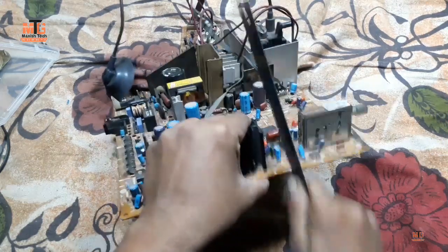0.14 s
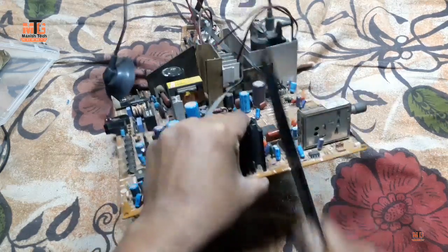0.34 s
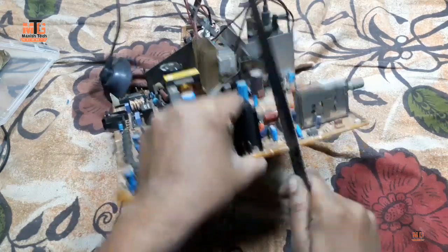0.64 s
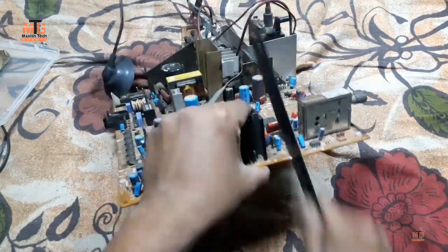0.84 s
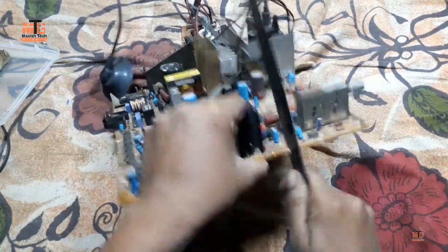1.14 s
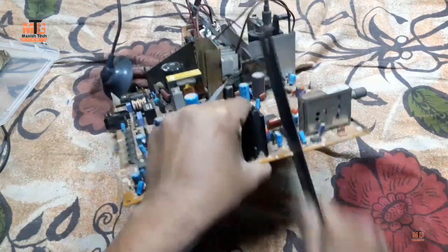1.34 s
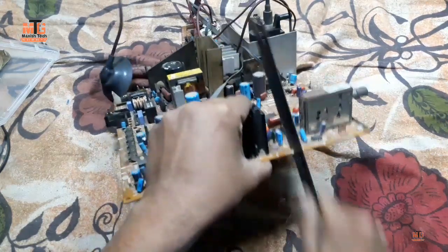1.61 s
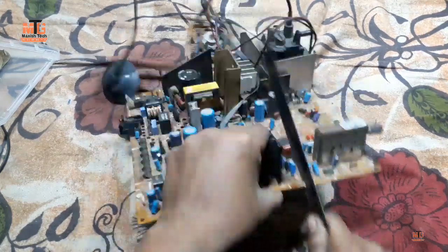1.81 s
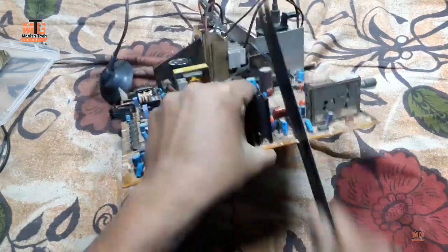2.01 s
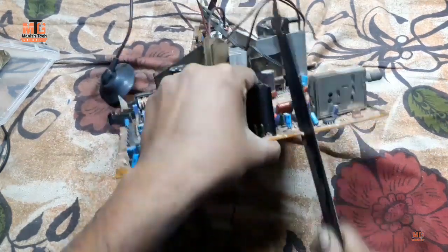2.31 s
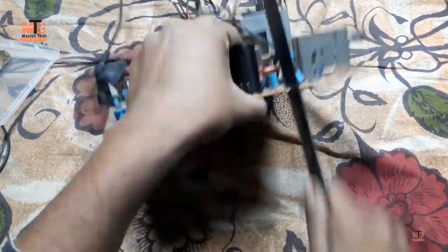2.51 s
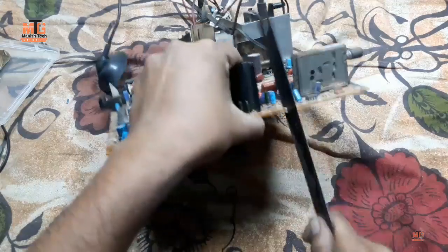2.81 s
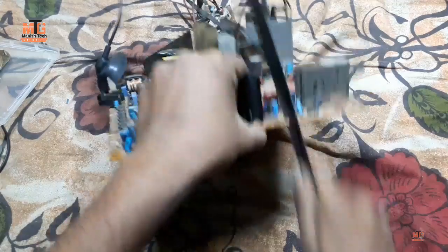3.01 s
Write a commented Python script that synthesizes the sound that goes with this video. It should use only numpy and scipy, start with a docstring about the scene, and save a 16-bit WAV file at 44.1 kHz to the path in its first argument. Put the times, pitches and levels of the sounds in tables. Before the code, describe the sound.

A hacksaw cuts a circuit board close up, about four back-and-forth strokes a second, with a gritty growl on each push and a rasp and thin metallic zing on each pull. At about 1.7 seconds it pauses with faint ticks. From 2 seconds until just past 3, the sawing resumes, slightly softer and less even, the blade knocking in the slot. The small room has a faint low rumble.

```python
"""Hacksaw through a circuit board.

A small room with a low rumble, one microphone close to a board held down on a cloth and sawn by hand,
four times a second. On the push the teeth bite and the loaded board growls in its modes; on the pull
they skate, rasp and make the blade zing. The blade knocks in the slot, also during the one short rest
in which the grip is changed. The room rings briefly behind it all."""
import sys
import numpy as np
from scipy import signal
from scipy.fft import rfft, irfft
from scipy.io import wavfile
from scipy.ndimage import uniform_filter1d, map_coordinates

SR = 44100
rng = np.random.default_rng(int(sys.argv[2]) if len(sys.argv) > 2 else 0)


def output_pcm(signal):
    """Save a mono or channel-first signal as 16-bit PCM at the path in sys.argv[1].

    Samples are clipped to [-1, 1] before scaling.
    """
    pcm = np.clip(np.atleast_2d(signal).T, -1, 1) * 32767
    wavfile.write(sys.argv[1], SR, np.round(pcm).astype(np.int16))


N = 138915
TIME = np.arange(N) / SR
REGRIP_S, CUTOFF_HZ = 1.9, 15500

# resonances (+) and dead spots (-) of board and saw frame: (frequency [Hz], width [Hz], lift [dB])
BOARD_MODES = [(329, 12.5, 11), (383, 24, -1), (510.6, 36, 6), (555.3, 21, 7), (640, 44, -0.5),
               (702, 14, 5.5), (770, 16, 3.5), (906, 24, 7), (1015, 15.6, 10), (1071, 17, 6), (1231, 14, 6),
               (1390, 16, 5.5), (1530, 34, -4), (1608, 13.4, 7.5), (1767, 78, 5), (2000, 45, 7),
               (2381, 79, 10), (2492, 57, 8.5), (2613, 140, -10), (3250, 68, 8)]
# resonances (+) and a dead spot (-) of the thin steel blade: (frequency [Hz], width [Hz], lift [dB])
STEEL_MODES = [(3670, 130, 5), (3830, 90, -8), (4150, 130, 5.5), (5560, 36, 3.5), (6830, 44, 4.5),
               (8080, 110, 4), (8820, 190, 6.5), (9870, 220, 4.5), (10820, 120, 2.5)]


def from_db(db):
    """Decibels to gain."""
    return 10 ** (np.asarray(db) / 20)


def rms_one(x):
    """Scale to unit power."""
    return x / np.sqrt(np.mean(x ** 2) + 1e-20)


def at_hz(points, hz):
    """Read a table on a log-frequency axis."""
    frequencies, values = np.transpose(points)
    return np.interp(np.log(np.maximum(hz, 1)), np.log(frequencies), values)


def drift(rate_hz):
    """Smooth random wander of unit power."""
    pole = np.exp(-2 * np.pi * rate_hz / SR)
    return rms_one(signal.lfilter([1], [1, -2 * pole, pole * pole], rng.standard_normal(N + SR))[SR:])


def colour(x, spectrum, modes=(), size=16384):
    """Causal filter of unit power gain: a broad colour with ringing resonances on top."""
    hz = np.arange(size // 2 + 1) * SR / size
    lifts = [1 + (from_db(db) ** 2 - 1) / (1 + (2 * (hz - f) / width) ** 2) for f, width, db in modes]
    magnitude = from_db(at_hz(spectrum, hz)) * np.sqrt(np.prod(lifts, axis=0))
    cepstrum = irfft(np.log(magnitude))
    cepstrum[1:size // 2] *= 2   # fold to minimum phase
    cepstrum[size // 2 + 1:] = 0
    response = irfft(np.exp(rfft(cepstrum)))
    return signal.fftconvolve(x, response / np.linalg.norm(response))[:N]


def bursts(events, decay_s):
    """A short dying burst of friction at each event."""
    gain = sum((TIME >= start) * from_db(db) * np.exp(-np.clip((TIME - start) / decay_s, 0, 20))
               for start, db in events)
    return gain * rng.standard_normal(N)


def room_tone():
    """The steady low rumble of the place, far below the saw."""
    # colour of the rumble: (frequency [Hz], level [dB])
    spectrum = [(20, -36), (42, -32), (60, -13), (120, -1), (180, -4), (330, -4), (480, -13), (1000, -18.5),
                (2500, -26), (6000, -35), (15500, -49)]
    return from_db(-42) * colour(rng.standard_normal(N), spectrum)


def room_reverb(x, delay_s=0.0047):
    """The near walls send the microphone a diffuse tail that dies band by band."""
    # reverberation of the room: (frequency [Hz], time to fall 60 dB [s])
    t60 = [(150, 0.66), (500, 0.36), (1500, 0.36), (4000, 0.3), (9000, 0.35), (16000, 0.041)]
    age, tail = TIME[:SR // 2], 0
    edges = np.geomspace(60, CUTOFF_HZ, 9)
    for low, high in zip(edges, edges[1:]):
        bandpass = signal.butter(2, [low, high], "band", fs=SR, output="sos")
        band = signal.sosfilt(bandpass, rng.standard_normal(len(age)))
        tail = tail + band * np.exp(-np.log(1000) * age / at_hz(t60, np.sqrt(low * high)))
    tail = tail * np.clip(age / delay_s - 1, 0, 1)
    return from_db(-11.5) * signal.fftconvolve(x, tail / np.linalg.norm(tail))[:N]


def steadying_hand(x):
    """The hand that steadies the board shifts its resonances when it takes a new grip."""
    # resonances each grip adds (+) or damps (-): (frequency [Hz], width [Hz], lift [dB])
    first_grip = [(1812, 91, 5), (2796, 34, 7), (3660, 140, 4.5), (6150, 160, 2.5), (10900, 1200, 4)]
    second_grip = [(232, 210, 4), (610, 130, -2.5), (1114, 140, 2.5), (1685, 100.5, 8), (2740, 440, -2.5),
                   (3270, 90, 4.5), (8420, 520, 5), (12400, 1200, 3.5)]
    # neutral colour: (frequency [Hz], level [dB])
    flat = [(20, 0), (20000, 0)]
    late = TIME > REGRIP_S
    return colour(x * ~late, flat, first_grip) + colour(x * late, flat, second_grip)


def flexing(x, depth=0.0041, rate_hz=3.96):
    """Board and blade flex under the arm, so their resonances wander a little from stroke to stroke."""
    lag_s = depth * drift(rate_hz) / (2 * np.pi * rate_hz)
    return map_coordinates(x, [(TIME - lag_s) * SR], order=3)


def blade_knocks():
    """The blade knocks or snags in the slot and sets board and steel ringing."""
    # knocks: (time [s], level [dB])
    knocks = [(.014, -26), (.498, -29), (.868, -17), (1.820, -31.5), (1.920, -33), (1.941, -29.5),
              (1.996, -21.5), (2.000, -22.5), (2.038, -23), (2.173, -15), (2.185, -20), (2.235, -8),
              (2.356, -19), (2.443, -25), (2.473, -13), (2.570, -27), (2.672, -15), (2.915, -17),
              (2.945, -18), (2.979, -11.5)]
    # colour of a knock: (frequency [Hz], level [dB])
    spectrum = [(50, -23), (200, -7), (800, 5), (2200, -1.5), (3000, -7.5), (6000, -10.5), (9000, -12.5),
                (15500, -24)]
    return from_db(2) * colour(bursts(knocks, decay_s=0.0024), spectrum, BOARD_MODES + STEEL_MODES)


def blade_chirps(width_hz=1900):
    """Each time the blade sticks it rings at a pitch set by where the slot pinches it."""
    # moments of sticking: (time [s], level [dB], pitch [Hz])
    sticks = [(0.3017, -5.5, 11200), (0.3158, -7, 8930), (0.424, -10, 8000), (0.5467, -5, 10600),
              (0.622, -15, 10100), (0.7913, -4, 8510), (0.8074, -11, 10890), (1.0398, -9.5, 9725),
              (1.056, -5, 8870), (1.3254, -11, 8860), (1.6955, -14, 9730), (2.1141, -14.5, 8680),
              (2.3554, -12, 8050), (2.615, -25, 8814), (2.8534, -20, 8490), (2.8635, -18, 8520),
              (3.106, -10, 8730)]
    chirps = np.zeros(N)
    for start, db, hz in sticks:
        resonance = signal.iirpeak(hz, hz / width_hz, fs=SR)
        chirps += signal.lfilter(*resonance, bursts([(start, db)], decay_s=0.0015))
    return chirps


def juddering(rate_hz=94, hold_s=0.031):
    """The blade catches and slips quickly; the arm evens out anything slower than hold_s."""
    slip = drift(rate_hz)
    return np.clip(rms_one(slip - uniform_filter1d(slip, int(hold_s * SR))), -2, 2)


def effort(strokes, levels_db, release_db_per_s, late_swell_db=0, arch_db=2):
    """Each stroke takes hold, swells along an arch and fades as the arm turns round."""
    gain = np.zeros(N)
    for (start, length, attack_s, swell_db), db in zip(strokes[:, :4], levels_db):
        age = TIME - start
        along = np.clip(age / length, 0, 1)
        attack = np.clip(age / attack_s, 0, 1)
        slope_db = (swell_db + late_swell_db * (start > REGRIP_S)) * (along - .5)
        hump_db = arch_db * (np.sin(np.pi * along) - 2 / np.pi)
        fade_db = release_db_per_s * np.maximum(age - length, 0)
        gain = np.maximum(gain, attack * from_db(db + slope_db + hump_db - fade_db))
    return gain


def blade_zing(strokes, release_db_per_s, judder_db=4):
    """The blade rubs the walls of the slot and sings in the high treble, now and then with a chirp."""
    # colour of the zing: (frequency [Hz], level [dB])
    spectrum = [(1000, -36), (7000, -21.5), (8300, -2), (9400, -2), (9900, -1.5), (11500, -2), (12600, -9),
                (15500, -14.5)]
    rub = rms_one(rng.standard_normal(N) * from_db(judder_db * juddering()))
    rub = rub * effort(strokes, strokes[:, 6] - 2.5, release_db_per_s)
    return colour(rub + blade_chirps(), spectrum, STEEL_MODES)


def teeth(strokes, teeth_per_s=820, end_speed=.7, jitter=.25, spread_db=2.5, crumble_s=0.0014):
    """Teeth strike the edge unevenly, fastest in mid-stroke; resin crumbles after each bite."""
    arch = sum(np.sin(np.pi * np.clip((TIME - start) / length, 0, 1)) for start, length in strokes[:, :2])
    speed = end_speed + (1 - end_speed) * arch
    rate = teeth_per_s * speed * np.exp(jitter * drift(teeth_per_s / 2))
    struck = np.diff(np.floor(np.cumsum(rate) / SR), prepend=0) > 0
    bites = struck * from_db(spread_db * np.clip(rng.standard_normal(N), -2, 2)) / np.sqrt(rate)
    crumble = signal.lfilter([1], [1, -np.exp(-1 / (crumble_s * SR))], bites) * rng.standard_normal(N)
    return rms_one(bites - bites.mean()), rms_one(crumble)


def sawing(strokes, growl_colour, growl_db, rasp_db, release_db_per_s):
    """Bites shake the board and crumbling resin rasps; both judder as the blade catches and frees."""
    # colour of the rasp: (frequency [Hz], level [dB])
    rasp_colour = [(200, -49.5), (1800, -7.5), (3000, 3), (4600, 1), (6200, 0), (7400, 0), (9000, -2),
                   (11200, -7), (13000, -10), (15500, -11.5)]
    crumble_share, dust_share = 0.62, 0.31
    growl_judder_db, rasp_judder_db = 2, 1.86
    bites, crumble = teeth(strokes)
    judder = juddering()
    force = np.sqrt(1 - crumble_share) * bites + np.sqrt(crumble_share) * crumble
    force = rms_one(force * from_db(growl_judder_db * judder))
    force *= effort(strokes, strokes[:, 4] + growl_db, release_db_per_s)
    dust_rub = rng.standard_normal(N)
    grit = np.sqrt(1 - dust_share) * crumble + np.sqrt(dust_share) * dust_rub
    grit = rms_one(grit * from_db(rasp_judder_db * judder))
    # in the looser second grip the rasp builds later in each stroke
    grit *= effort(strokes, strokes[:, 5] + rasp_db, release_db_per_s=574, late_swell_db=5)
    growl = colour(force, growl_colour, BOARD_MODES)
    rasp = colour(grit, rasp_colour, BOARD_MODES + STEEL_MODES)
    return growl + rasp


def pull_strokes(release_db_per_s=563):
    """On the pull the teeth skate: a lighter growl, with rasp and the zing of the blade."""
    # pulls: (start [s], length [s], attack [s], swell [dB], growl [dB], rasp [dB], zing [dB])
    pulls = [(0.008,0.056,0.0018,3.5,-24,-25,-23.5), (0.239,0.08,0.00084,1,-21.5,-23.5,-20.5),
             (0.495,0.082,0.0019,-0.5,-20.5,-21.5,-24), (0.737,0.085,0.012,7,-23,-24,-23.5),
             (0.985,0.093,.012,7,-23,-23.5,-27), (1.237,0.097,.014,1.5,-22,-22.5,-26.5),
             (1.498,0.083,.004,6,-21,-23.5,-28.5), (2.036,0.086,0.011,7.5,-24.5,-28,-34.5),
             (2.297,.092,0.014,7.5,-28,-30.5,-40), (2.564,0.063,0.008,3.5,-23.5,-27,-50),
             (2.797,0.076,.01,0.5,-21,-24.5,-31.5), (3.051,0.08,0.0071,8,-25.5,-27,-32.5)]
    # colour of the growl under skating teeth: (frequency [Hz], level [dB])
    growl_colour = [(40, -48), (110, -22), (250, -1), (420, -3), (620, -6), (920, -2.5), (1400, -1),
                    (2450, -3.5), (2750, -6.5), (5000, -21), (16000, -48.5)]
    strokes = np.array(pulls)
    skating = sawing(strokes, growl_colour, growl_db=0.5, rasp_db=0, release_db_per_s=release_db_per_s)
    return skating + blade_zing(strokes, release_db_per_s)


def push_strokes():
    """On the push the teeth bite and the loaded board growls over the rasp."""
    # pushes: (start [s], length [s], attack [s], swell [dB], growl [dB], rasp [dB])
    pushes = [(.112,0.081,0.0053,2.5,-16,-24.5), (0.354,0.098,0.014,1.5,-15,-26),
              (.618,0.084,0.0046,0,-15.5,-24), (0.861,0.089,0.01,5,-15,-24.5),
              (1.11,0.092,0.013,1.5,-14,-22.5), (1.359,0.097,0.026,4.5,-15,-25),
              (1.624,0.083,0.0059,7.5,-15.5,-25), (2.163,.083,0.0095,1,-19.5,-28.5),
              (2.469,.036,0.0042,-3,-20,-28), (2.666,0.095,0.0039,-0.5,-17,-26.5),
              (2.912,.085,0.0044,3.5,-17.5,-27)]
    # colour of the loaded board's growl: (frequency [Hz], level [dB])
    growl_colour = [(40, -43), (110, -23), (250, -11), (420, -8), (620, -9), (920, -2), (1400, -8.5),
                    (2450, -10.5), (2750, -13.5), (5000, -35), (16000, -64)]
    return sawing(np.array(pushes), growl_colour, growl_db=-0.33, rasp_db=-0.5, release_db_per_s=693)


def scene():
    """In mono: the saw close up, the walls and the room tone behind it."""
    saw = push_strokes() + pull_strokes() + blade_knocks()
    saw = flexing(steadying_hand(saw))
    return (saw + room_reverb(saw) + room_tone())[None]


def record(dry, ceiling=0.76):
    """The microphone chain rounds the peaks and cuts the highest treble."""
    lowpass = signal.ellip(10, .2, 80, CUTOFF_HZ, fs=SR, output="sos")
    return signal.sosfilt(lowpass, ceiling * np.tanh(dry / ceiling))


dry = scene()
out = record(dry)
output_pcm(out)
```